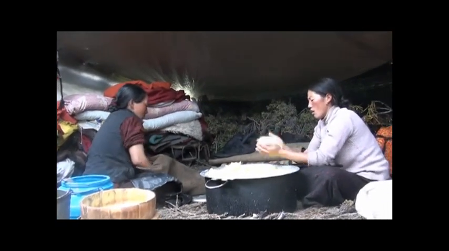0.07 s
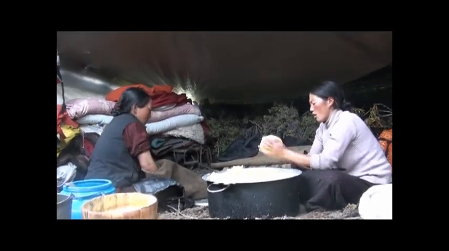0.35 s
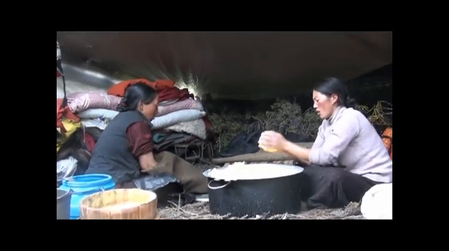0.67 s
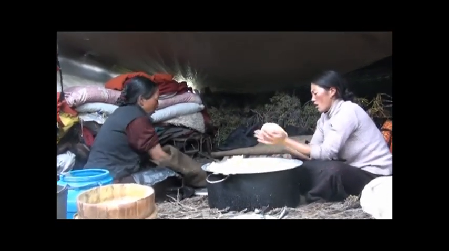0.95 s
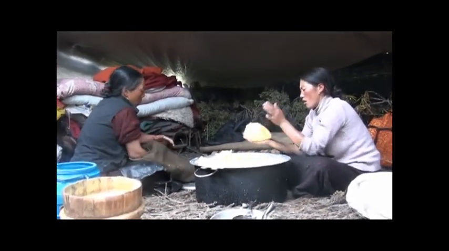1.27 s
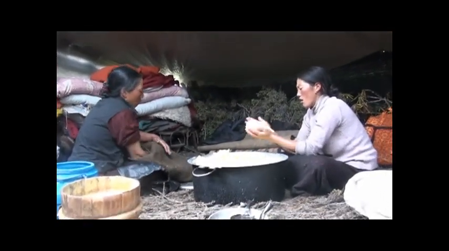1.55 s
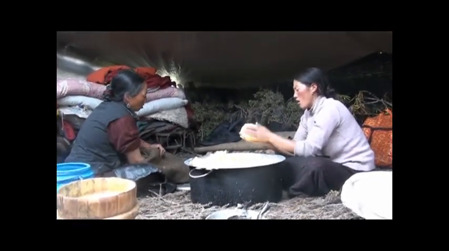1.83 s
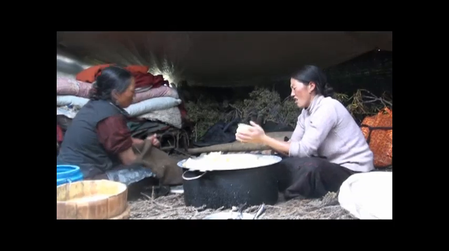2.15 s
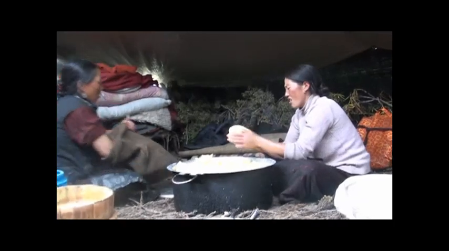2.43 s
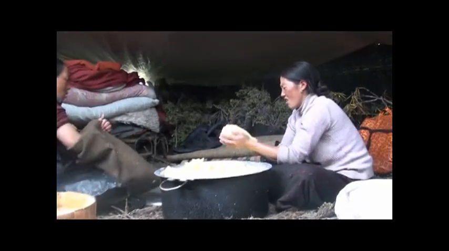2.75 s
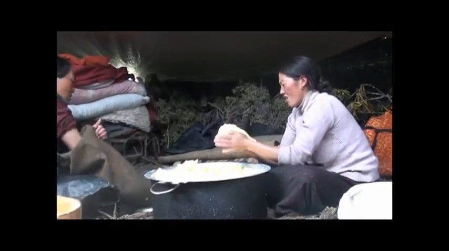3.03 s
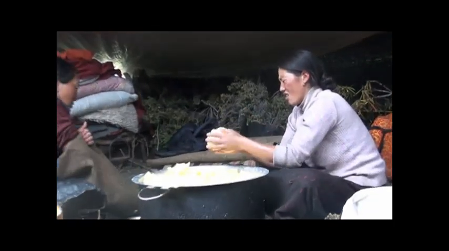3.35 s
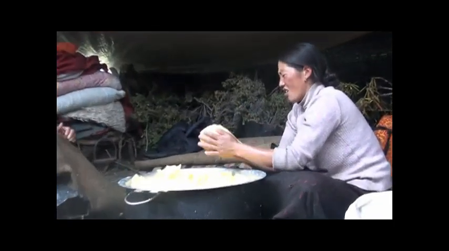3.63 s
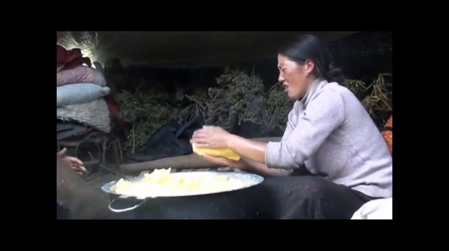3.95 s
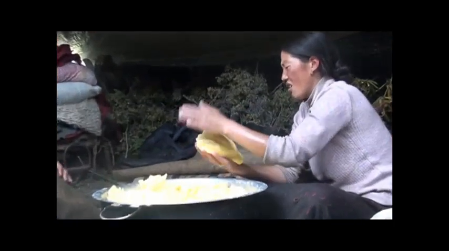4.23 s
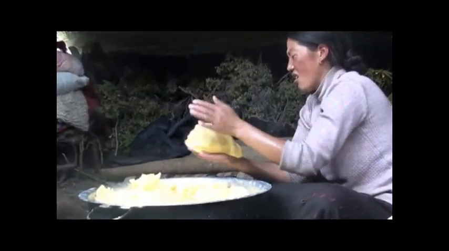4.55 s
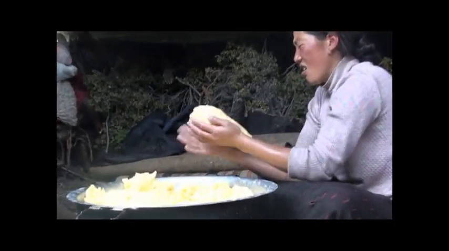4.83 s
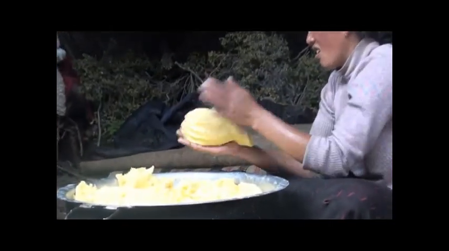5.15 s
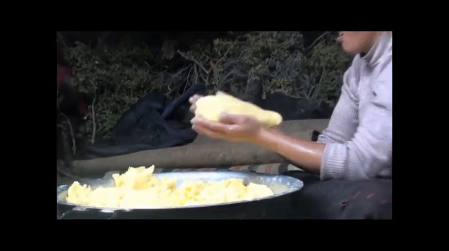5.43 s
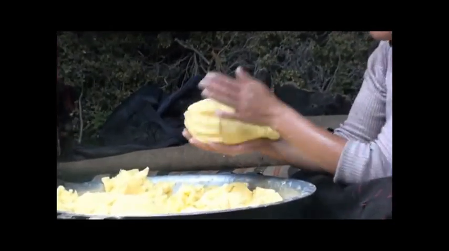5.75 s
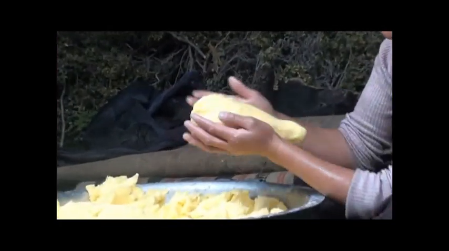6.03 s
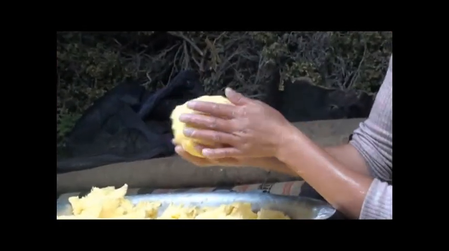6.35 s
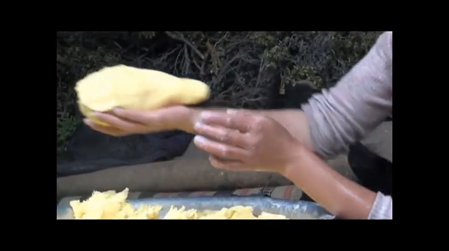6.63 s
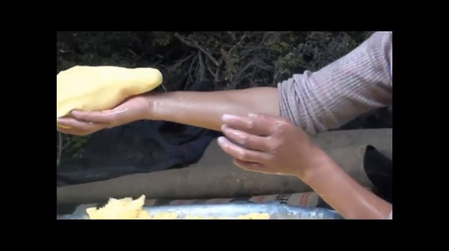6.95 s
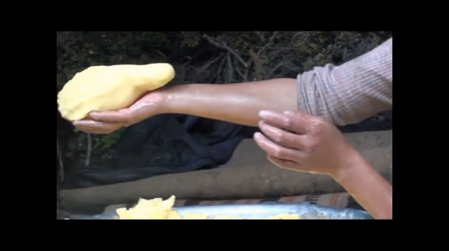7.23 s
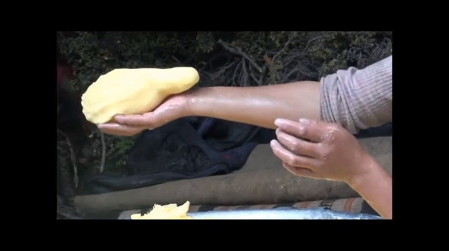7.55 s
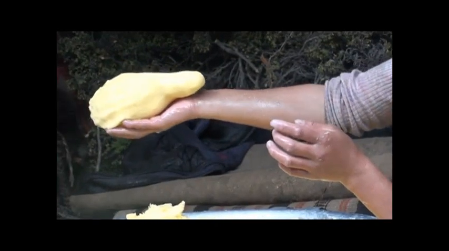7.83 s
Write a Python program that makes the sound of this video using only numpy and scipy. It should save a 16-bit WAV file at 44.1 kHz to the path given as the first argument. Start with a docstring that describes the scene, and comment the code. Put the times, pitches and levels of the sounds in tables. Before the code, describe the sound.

Bare hands slap a lump of fresh butter from palm to palm, about three wet smacks a second, some sharp and some light, with small squelches between. About two seconds in, a coarse sack drags softly over straw. The slaps stop after six seconds, leaving soft low bumps, a faint squeak and another brief drag. The sound is fairly close and dry, inside a quiet cloth tent.

```python
"""A wet slap, then more at about three a second: butter is tossed from palm to palm in a quiet cloth tent.
Each slap squeezes air and water from pockets under the hand, which ring as cavity resonators.
Between slaps the fingers squelch, rub and squeak on the butter. Beside it a coarse sack is dragged
over the straw floor in stick-slip motion. There are a few soft bumps and, near the end, one faint
far whistle, all over still outdoor air and a distant drone."""
import sys
import numpy as np
from scipy import signal
from scipy.fft import rfft, irfft, next_fast_len
from scipy.io import wavfile
from scipy.ndimage import uniform_filter1d

SR = 44100
rng = np.random.default_rng(int(sys.argv[2]) if len(sys.argv) > 2 else 0)


def bounce(signal):
    """Save signal as a 16-bit WAV file at the path given by the first command-line argument."""
    frames = np.transpose(np.atleast_2d(signal))
    limited = np.clip(frames, -1, 1)
    pcm = np.round(limited * 32767).astype(np.int16)
    wavfile.write(sys.argv[1], SR, pcm)


N = 347508
TIME = np.arange(N) / SR
SHORT = TIME[:SR // 5]   # time within one event
# stereo width of sound in the tent: frequency_hz, side_db
TENT_WIDTH = [(150, -22), (500, -18.5), (1400, -21), (4500, -16.5), (8500, -12.5), (12000, -12)]


def slaps(lead_s=.003, squeeze_s=.0009, burst_s=.0005, usual_pocket_hz=2696):
    """Cavity resonance: the hand squeezes out a hiss, then the water film bursts and rings air pockets."""
    # blows of the hand: start_s, strength_db, cupping_db, thud_db, palm_hz, middle_hz, seal_q, splatter_s
    blows = [(0.0374, -26, 1, -47, 1810, 3750, 3.5, 0.00077),
             (.4063, -37, 1.5, -45.5, 1390, 2230, 21, 0.00077),
             (0.7491, -27.5, -1.5, -52, 1380, 2780, 10.5, 0.0029),
             (1.0961, -30, 2.5, -41.5, 1190, 2430, 2, .001),
             (1.4508, -30, 4.5, -46, 2170, 2745, 16, 0.00052),
             (1.799, -40.5, -0.5, -53.5, 1770, 2800, 2.2, 0.00043),
             (2.1112, -37, -1.5, -49, 1210, 2650, 2.9, 0.0011),
             (2.4396, -44, -2.5, -53, 1410, 2900, 2.1, 0.0012),
             (2.752, -28, 0, -45, 1360, 2780, 3.2, 0.0022),
             (3.053, -39.5, -3.5, -53.5, 1780, 3650, 3.6, .0005),
             (3.343, -28, -0.5, -48, 1465, 3700, 5.9, .0055), (3.676, -54, 2, -60, 1940, 3200, 1.6, 0.0059),
             (3.9914, -34, 2.5, -52, 1450, 2330, 3.2, .0019),
             (4.366, -49.5, 6, -63, 2300, 2970, 3.5, 0.0023),
             (4.6993, -33, 1.5, -46.5, 2450, 3020, 6.3, 0.00073),
             (4.9921, -42, .5, -51, 1190, 2620, 2.7, .0007), (5.27, -34, -1, -49, 1420, 2650, 1.7, 0.001),
             (5.639, -46, 1.5, -57.5, 1600, 3800, 3.6, 0.0019),
             (5.942, -33, -1.5, -45.5, 1650, 2700, 2.7, 0.00027),
             (6.2715, -55, 2, -64.5, 1507, 3240, 2, 0.0021)]
    out, t = np.zeros((2, N)), SHORT - lead_s
    for start_s, strength_db, cupping_db, thud_db, palm_hz, middle_hz, seal_q, splatter_s in blows:
        squeeze = from_db(-15) * np.exp(-abs(t) / squeeze_s)
        splatter = from_db(-11) * np.exp(-abs(t) / (2 * splatter_s))
        smack = np.exp(-abs(t) / burst_s) + splatter
        film = np.where(t < 0, squeeze, smack) * crackle(t, grain_db=2.5)
        burst = tent(whiten(film, width_hz=350))
        # the soft lump takes a dull push and a heavily damped knock
        push = band(burst, 115, 470, order=1)
        knock = from_db(-5) * resonance(burst, hz=520, q=1)
        thud = at_level(push + knock, thud_db)
        # cupping moves sound from the fingers and the spray to the palm
        palm = at_level(resonance(burst, palm_hz, q=2.7), strength_db - 4 + cupping_db)
        spray = at_level(band(burst, 6500, 10800), strength_db - 2 - cupping_db)
        # a well sealed middle pocket pops louder and with a clear pitch
        pop_db = strength_db - 1.5 + 1.15 * np.log2(seal_q)
        middle = at_level(resonance(burst, middle_hz, seal_q), pop_db)
        # the gaps between the fingers shrink with the middle pocket
        finger_hz = 5400 * (middle_hz / usual_pocket_hz) ** .53
        fingers = at_level(resonance(burst, finger_hz, q=3.3), strength_db + .5 - cupping_db)
        add(out, start_s - lead_s, thud - palm + middle - fingers + spray)
    return signal.sosfilt(signal.butter(2, 85, "high", fs=SR, output="sos"), out + 1e-18)


def squelches():
    """Impulsive excitation: wet skin meets or leaves the butter in a little cloud of clicks."""
    # wet finger squelches and one light pat: start_s, level_db, centre_hz, length_s
    touches = [(0.612, -62.5, 4450, 0.066), (0.868, -56, 4440, 0.025), (0.898, -58, 4050, .076),
               (0.978, -58.5, 4370, 0.013), (1.166, -60, 5320, 0.0074), (1.801, -60, 7120, 0.0024),
               (1.904, -64.5, 4340, 0.018), (2.886, -68, 6030, 0.019), (3.733, -68, 5540, .002),
               (3.869, -60.5, 3020, 0.008), (4.363, -49, 3300, .006), (4.412, -65, 2940, 0.0095),
               (5.0635, -53.5, 5500, 0.0093), (5.508, -67, 2870, 0.016), (6.357, -58.5, 1600, 0.0028),
               (6.682, -67.5, 5980, 0.0073)]
    out = np.zeros((2, N))
    for start_s, level_db, centre_hz, length_s in touches:
        envelope = SHORT / length_s * np.exp(-3 * SHORT / length_s)
        clicks = tent(envelope * crackle(SHORT, grain_db=9.5))
        add(out, start_s - .002, at_level(resonance(clicks, centre_hz, q=1), level_db))
    return low_pass(out + 1e-18, hz=12400)


def tent(x, tail_db=-.5, build_up_s=.0028):
    """Reflection and absorption: hard things answer within milliseconds; cloth swallows the rest."""
    # echoes off the pot rim, the tray and the ground: delay_s, gain_db
    echoes = [(.0026, -2.5), (.0034, -1), (.0045, -5)]
    # reverberation time by band: low_hz, high_hz, t60_s
    decays = [(79.4, 1400, 0.088), (1004, 4000, 0.074), (3514, 13000, 0.1)]
    early = np.zeros(len(SHORT))
    early[0] = 1
    for delay_s, gain_db in echoes:
        stretch = 1 + .08 * rng.standard_normal()   # paths change as the hands move
        early[int(abs(delay_s * stretch) * SR)] += from_db(gain_db)
    tails = sum(band(rng.standard_normal((2, len(SHORT))), low_hz, high_hz) * from_db(-60 * SHORT / t60_s)
                for low_hz, high_hz, t60_s in decays)
    build_up = np.clip(SHORT / build_up_s - .5, 0, 1)
    mid_tail, side_tail = (from_db(tail_db) * energy_one(build_up * tail) for tail in tails)
    mid, side = (signal.fftconvolve(x, echo)[:len(SHORT)] for echo in (early + mid_tail, side_tail))
    return stereo(energy_one(whiten(mid, width_hz=540)), energy_one(side), TENT_WIDTH)


def sack(catch_db=3.5):
    """Stick-slip friction: coarse cloth catches on the straw and lets go in countless small snaps."""
    # spectrum of cloth on straw: frequency_hz, density_db
    spectrum = [(47, -38.5), (80, -15), (108, -6), (333, -8), (524, -5.5), (572, -11.5), (1050, -6.5),
                (1420, -9), (3150, -10), (12300, -21.5), (14000, -55.5)]
    # three pulls, each a curve of points: time_s, level_db
    pulls = [
        [(2.1, -75.5), (2.27, -59), (2.38, -74)],
        [(2.38, -68), (2.54, -57.5), (2.6, -48.5), (2.67, -59.5), (2.74, -65.5), (2.94, -68), (3.3, -70),
         (3.46, -80)],
        [(7.38, -76), (7.48, -65), (7.505, -53), (7.54, -61.5), (7.62, -63), (7.68, -65), (7.75, -84)],
    ]
    mid, side = (rms_one(tint(crackle(TIME, grain_db=4), spectrum)) for _ in range(2))
    curves_db = [np.interp(TIME, *np.transpose(pull), left=-np.inf, right=-np.inf) for pull in pulls]
    level_db = np.max(curves_db, axis=0) + catch_db * drift(rate_hz=90)
    return from_db(level_db) * stereo(mid, side, TENT_WIDTH)


def rubs():
    """Resonance: slow rubs and one bump sound low and hollow; each slip squeaks at its own pitch."""
    # low hollow rubs, and one short soft handling bump near 7 s: middle_s, level_db, half_length_s
    contacts = [(0.637, -72, 0.064), (0.944, -66, .065), (2.23, -65.5, 0.038), (3.17, -66.5, 0.055),
                (5.113, -68.5, 0.11), (7.009, -53.5, 0.0042)]
    # short squeaks and scrapes: middle_s, level_db, pitch_hz, half_length_s
    slips = [(2.838, -55.5, 1090, .009), (3.25, -63, 550, 0.009), (3.726, -60, 5570, 0.0076),
             (4.821, -59, 3320, 0.0038), (5.521, -65, 820, 0.016), (7.617, -62, 1074, 0.059)]
    hollow = sum(friction(s, db, half_s, hz=312.3, q=4) for s, db, half_s in contacts)
    squeaks = sum(friction(s, db, half_s, hz, q=6.5) for s, db, hz, half_s in slips)
    return hollow + squeaks


def friction(middle_s, level_db, half_length_s, hz, q):
    """Forced vibration: an uneven contact force swells and fades in one resonance."""
    force = crackle(TIME, grain_db=6)
    vibration = rms_one(resonance(resonance(force, hz, q / 2), hz, q / 2))
    swell = np.exp(-((TIME - middle_s) / half_length_s) ** 2)
    return from_db(level_db) * swell * vibration


def bumps(pitch_hz=167.7, onset_s=.0023):
    """Damped oscillation: soft knocks die within a few uneven cycles."""
    # low bumps of handling: start_s, level_db, t60_s
    knocks = [(1.396, -46, .042), (1.623, -57.5, .076), (3.674, -53.5, 0.07), (4.08, -51, 0.053),
              (4.174, -58, 0.079), (5.721, -56.5, 0.096), (6.722, -49.5, 0.051), (6.776, -57, 0.062),
              (7.066, -56, 0.085), (7.159, -58, 0.18), (7.191, -54.5, 0.18)]
    out = np.zeros(N)
    tone = np.sin(2 * np.pi * pitch_hz * SHORT)
    onset = 1 - np.exp(-SHORT / onset_s)
    for start_s, level_db, t60_s in knocks:
        roughness = .37 * rms_one(band(rng.standard_normal(len(SHORT)), pitch_hz / 2, pitch_hz * 2))
        decay = from_db(level_db - 60 * SHORT / t60_s)
        add(out, start_s, decay * onset * (tone + roughness))
    return out


def whistle(start_s=6.87, length_s=.22, start_hz=1430, end_hz=1270, level_db=-73):
    """A gliding pure tone: one faint falling call from far outside."""
    progress = np.clip((TIME - start_s) / length_s, 0, 1)
    pitch_hz = start_hz + (end_hz - start_hz) * progress + 6 * drift(rate_hz=70)
    envelope = np.minimum(10 * progress, 1) * np.sqrt(1 - progress)
    return from_db(level_db) * np.sqrt(2) * envelope * np.sin(2 * np.pi * np.cumsum(pitch_hz) / SR)


def background(air_db=-69, drone_hz=106):
    """Ambient noise: broadband air with a fine hiss, and a band so narrow that it is heard as a drone."""
    # spectrum of still outdoor air: frequency_hz, density_db
    spectrum = [(15, -23.5), (25, -8.5), (80, -9.5), (101, -2), (134, -5), (165, -1.5), (243, -4),
                (314, -2.5), (429, -6), (756, -6), (1110, -6.5), (1440, -8), (1640, -10.5), (12000, -24.5),
                (15600, -58), (22000, -120)]
    # stereo width of the open air: frequency_hz, side_db
    width = [(60, -12.5), (150, -12.5), (380, -2), (950, -1), (2400, 0), (6000, -3.5), (12000, -4)]
    # swell of the distant drone: time_s, level_db
    swell = [(0, -103), (1.8, -86), (2.0, -70.5), (2.6, -77.5), (3.1, -78.5), (4.6, -88.5), (5.5, -84),
             (7.4, -80), (7.88, -74)]
    mid, side = (rms_one(tint(rng.standard_normal(N), spectrum)) for _ in range(2))
    air = low_pass(stereo(mid, side, width), hz=12100)
    drone = rms_one(band(rng.standard_normal(N), drone_hz - 5, drone_hz + 5))
    drone_db = np.interp(TIME, *np.transpose(swell))
    return from_db(air_db + .24 * drift(rate_hz=15)) * air + from_db(drone_db) * drone


def from_db(db):
    return 10 ** (np.asarray(db) / 20)


def rms_one(x):
    return x / np.sqrt(np.mean(x ** 2) + 1e-20)


def energy_one(x):
    return x / np.sqrt(np.sum(x ** 2) + 1e-20)


def at_level(x, db):
    """Equal energy: a short stereo sound gets the energy of 10 ms at this rms level."""
    return from_db(db) * np.sqrt(2 * SR / 100) * energy_one(x)


def add(out, start_s, sound):
    """Superposition: a sound joins the mix at its start time."""
    start = max(round(start_s * SR), 0)
    out[..., start:start + sound.shape[-1]] += sound[..., :N - start]


def band(x, low_hz, high_hz, order=2):
    sos = signal.butter(order, [low_hz, min(high_hz, .45 * SR)], "band", fs=SR, output="sos")
    return signal.sosfilt(sos, x + 1e-18)


def low_pass(x, hz):
    return signal.sosfilt(signal.ellip(8, .5, 60, min(hz, .45 * SR), fs=SR, output="sos"), x)


def resonance(x, hz, q):
    return signal.lfilter(*signal.iirpeak(min(hz, .4 * SR), max(q, .6), fs=SR), x + 1e-18)


def drift(rate_hz):
    """Random modulation: straight lines join normal draws of spread 1."""
    return np.interp(TIME * rate_hz, np.arange(4000), rng.standard_normal(4000))


def crackle(t, grain_db):
    """Impulsive noise: a dense run of tiny bursts of uneven size."""
    return rng.standard_normal(len(t)) * from_db(grain_db * np.minimum(rng.exponential(1, len(t)), 5))


def whiten(x, width_hz):
    """Spectral whitening: the broad colour of a burst is levelled and its fine grain stays."""
    spectrum = rfft(x, 2 * len(x))
    bins = max(int(width_hz * 2 * len(x) / SR), 1)
    power = uniform_filter1d(abs(spectrum) ** 2, size=bins)
    return irfft(spectrum / np.sqrt(np.abs(power) + 1e-20))[:len(x)]


def tint(x, spectrum):
    """Spectral shaping: the gain follows a curve over log frequency."""
    hz, db = np.transpose(spectrum)
    size = next_fast_len(len(x) + len(SHORT))
    log_hz = np.log(np.maximum(np.fft.rfftfreq(size, 1 / SR), 1))
    gain = from_db(np.interp(log_hz, np.log(hz), db))
    return irfft(rfft(x, size) * gain, size)[:len(x)]


def stereo(mid, side, width):
    """Mid-side stereo: the shaped side signal adds on the left and subtracts on the right."""
    return mid + tint(side, width) * np.array([[1], [-1]])


def scene():
    """A level difference sets slaps and squelches just left of centre; the rest lies straight ahead."""
    hands = (slaps() + squelches()) * from_db([[.25], [-.25]])
    return hands + sack() + rubs() + bumps() + whistle() + background()


def record(dry, cutoff_hz=14600):
    """Band limiting: the top treble is cut steeply."""
    return signal.sosfilt(signal.ellip(10, .2, 70, cutoff_hz, fs=SR, output="sos"), dry)


dry = scene()
out = record(dry)
bounce(out)
```